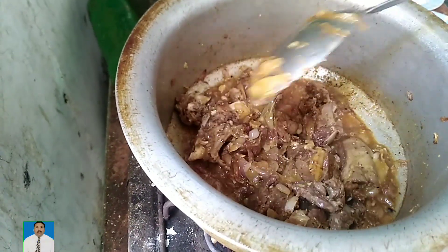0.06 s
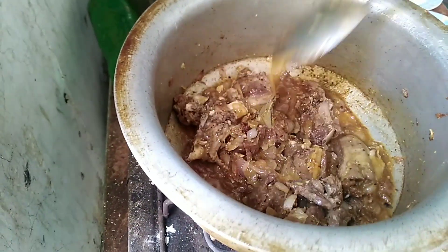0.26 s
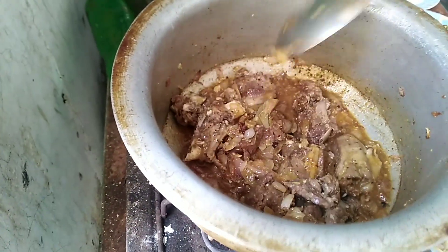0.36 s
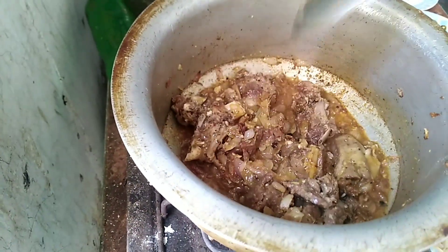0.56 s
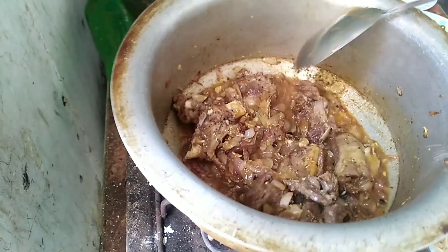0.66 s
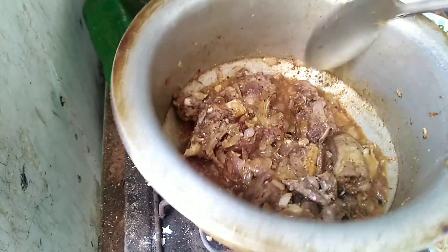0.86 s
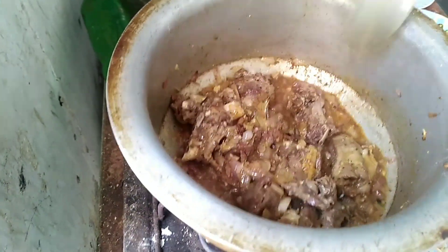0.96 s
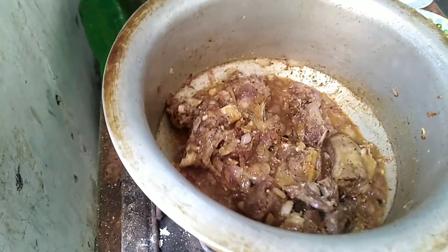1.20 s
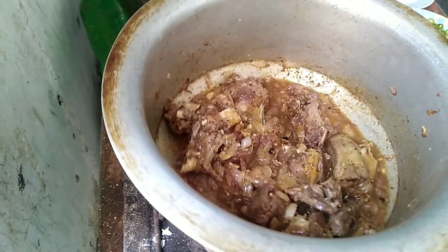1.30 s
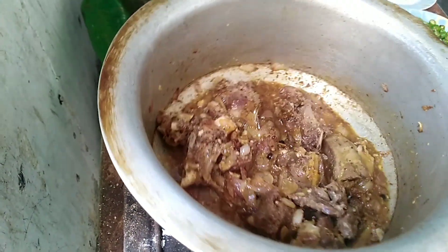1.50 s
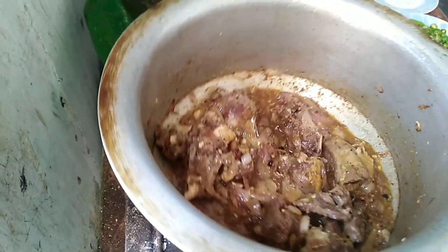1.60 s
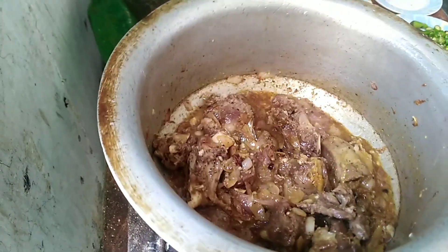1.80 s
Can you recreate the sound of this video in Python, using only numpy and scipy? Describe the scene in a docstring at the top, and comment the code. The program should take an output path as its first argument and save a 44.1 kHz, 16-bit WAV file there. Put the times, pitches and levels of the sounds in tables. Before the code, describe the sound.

A steel ladle knocks on the rim of a big aluminium pot at about 0.2, 0.4, 0.63 and 0.83 seconds. The first is lighter; the others clang harder, with a hollow thump and boomy metallic ring. Brief ladle chatter and dull plops of scraps follow, until 0.95. The ring fades by about 1.5, leaving faint sizzling to the end. Very close, clipped stereo, small kitchen.

```python
"""A steel ladle raps four times on the rim of a big aluminium pot, right by a stereo microphone that overloads.
Each rap sums a noise contact, a damped thump of air, a ringing rim, side, base and ladle, and a noise-built wall.
The ladle chatters as short clusters of high noise; scraps of meat drop as dull damped tones.
Stew sizzles quietly all the while in a small kitchen: patchy filtered noise and random spits.
The recorder leaves faint blips, turns quiet bands down, clips the peaks and cuts the extreme treble."""
import sys
import numpy as np
from scipy import signal
from scipy.fft import rfft, irfft, next_fast_len
from scipy.io import wavfile
from scipy.ndimage import uniform_filter1d, map_coordinates

SR = 44100
rng = np.random.default_rng(int(sys.argv[2]) if len(sys.argv) > 2 else 0)


def transcribe(u):
    """Save the signal u as a 16-bit wav file named by the first command-line argument.

    u: samples, shape (n,) or (channels, n), limited to [-1, 1]; the rate is SR.
    q: integer samples, one column per channel.
    """
    v = np.clip(np.atleast_2d(u).T, -1, 1)
    q = np.round(v * 32767).astype(np.int16)
    wavfile.write(sys.argv[1], SR, q)


N = 81585
T = np.arange(int(SR * .9)) / SR  # the time axis of one blow, s
WAVER_HZ, WAVER = 55, .28  # unsteadiness of struck metal: knots per second, depth in radians and in gain
MODE_SCATTER_DB, MODE_ATTACK_S = 1.5, .0012


def amp(db):
    """Decibels to gain."""
    return 10 ** (np.asarray(db) / 20)


def unit(x):
    """Scale to rms 1."""
    return x / np.sqrt(np.mean(x ** 2) + 1e-20)


def along(points, hz):
    """Read (freq_hz, value) points on a log frequency axis."""
    f, v = np.transpose(points)
    return np.interp(np.log(hz + 1), np.log(f + 1), v)


def fade(t60, t=T):
    """Exponential decay that falls 60 dB in t60 seconds."""
    return np.exp(-np.log(1000) * t / t60)


def swell(build_up_s, t=T):
    """Exponential approach to full level."""
    return 1 - np.exp(-t / build_up_s)


def wobble(rate):
    """A smooth random curve over one ring, rate knots a second."""
    return map_coordinates(rng.standard_normal(256), [T * rate], mode="wrap")


# Stereo lean of the pot at the microphone: freq_hz, left_minus_right_db
POT_BALANCE = [(100, -6), (450, -5), (1000, -3), (1600, -4.5), (2600, -0.5), (4000, 1), (5600, 11.5),
               (8000, 5), (14000, 4.5)]


def pan(hz, balance=POT_BALANCE):
    """Left and right gains at these frequencies, with their mean power held at 1."""
    lean_db = along(balance, np.atleast_1d(hz))
    gains = amp(np.array([[.5], [-.5]]) * lean_db)
    return gains / np.sqrt(np.mean(gains ** 2, axis=0))


def add(out, s, x):
    """Mix x into out at time s."""
    i = int(round(s * SR))
    out[:, i:i + x.shape[1]] += x[:, :N - i]


def filtered(x, response):
    """Multiply the spectrum of x by a response of frequency."""
    m = next_fast_len(x.shape[-1] + 2048)
    return irfft(rfft(x, m) * response(np.fft.rfftfreq(m, 1 / SR)), m)[..., :x.shape[-1]]


# How alike the two channels are, for noise and ringing modes: freq_hz, likeness (0 to 1)
LIKENESS = [(100, 0.89), (400, .9), (800, 0.23), (2000, 0), (6000, 0), (14000, 0.43)]


def angle_apart(hz):
    """Phase angle in radians whose cosine is the left-right likeness."""
    return np.arccos(np.clip(along(LIKENESS, hz), -1, 1))


def coloured(white, db_of_hz, balance=POT_BALANCE):
    """Two unrelated signals to a stereo pair of rms 1, most alike in the bass."""
    def mid_side_gain(hz):
        turn = angle_apart(hz) / 2
        return amp(db_of_hz(hz)) * [np.cos(turn), np.sin(turn)]

    mid, side = filtered(white, mid_side_gain)
    left_right = np.array([mid + side, mid - side])
    return unit(filtered(left_right, lambda hz: pan(hz, balance)))


def burst(db_of_hz, balance=POT_BALANCE):
    """Fresh coloured stereo noise for one blow."""
    return coloured(rng.standard_normal((2, len(T))), db_of_hz, balance)


def tone(hz, t60, attack_s, t=T):
    """One damped resonance, in step at both ears."""
    return pan(hz) * np.sin(2 * np.pi * hz * t) * fade(t60, t) * swell(attack_s, t)


def ring(pitches, levels_db, t60s):
    """Struck modes that waver a little; where likeness is low they reach the two ears out of step."""
    out = np.zeros((2, len(T)))
    for hz, db, t60 in zip(pitches, levels_db, np.broadcast_to(t60s, len(pitches))):
        apart = angle_apart(hz) * rng.choice([-.5, .5])
        phase = rng.uniform(0, 2 * np.pi) + np.array([[apart], [-apart]]) + WAVER * wobble(WAVER_HZ)
        struck = amp(db + MODE_SCATTER_DB * rng.standard_normal())
        size = struck * (1 + WAVER * wobble(WAVER_HZ))
        out += size * pan(hz) * fade(t60) * np.sin(2 * np.pi * hz * T + phase)
    return out * swell(MODE_ATTACK_S)


# Colour of the frying: freq_hz, relative_db_per_hz
SIZZLE_COLOUR = [(18, -67.5), (30, -28.5), (83, -5.5), (346, -10.5), (497, -18.5), (1090, -8),
                 (1270, -17.5), (1650, -10), (2030, -24), (2250, -5), (2560, -11.5), (5730, -1.5),
                 (13900, -26.5), (15000, -48.5)]
# Rise and fall of the frying, in two runs of points: start_s, relative_level_db
SIZZLE_COURSE = [
    [(0.0, -54.5), (0.014, -49.5), (0.066, -53), (0.1, -50), (0.17, -50.5)],
    [(1.25, -51), (1.646, -49), (1.656, -53), (1.844, -55), (1.85, -50)],
]
# Stereo lean of the frying: freq_hz, left_minus_right_db
SIZZLE_LEAN = [(100, -1.5), (1000, -5), (2500, 0.5), (5500, 10), (12000, 2)]
SIZZLE_DB, PATCHY_DB = 3.5, 3.5  # gain over the course above; unevenness of the hiss
SPIT_RATE, SPIT_DB, SPIT_SPREAD_DB = 1200, -8, 3  # spits per second; level against the hiss; size spread


def sizzle():
    """A hiss of frying, patchy in time and pitch, with tiny spits of fat as random clicks on top."""
    z = signal.stft(rng.standard_normal((2, N)), nperseg=512)[2]
    patches = uniform_filter1d(rng.standard_normal(z.shape[1:]), size=5, axis=0)
    patches = uniform_filter1d(patches, size=14, axis=1)
    hiss = unit(signal.istft(z * amp(PATCHY_DB * unit(patches)), nperseg=512)[1][:, :N])
    when = rng.random(N) < SPIT_RATE / SR
    size = amp(SPIT_SPREAD_DB * np.minimum(rng.exponential(size=N), 4))
    spits = when * size * rng.standard_normal((2, N))
    frying = hiss + amp(SPIT_DB) * unit(spits)
    level_db = np.interp(np.arange(N) / SR, *np.vstack(SIZZLE_COURSE).T)
    return amp(level_db + SIZZLE_DB) * coloured(frying, lambda hz: along(SIZZLE_COLOUR, hz), SIZZLE_LEAN)


# Faint blips left by the recorder's noise suppressor: pitch_hz, level_db (before random size)
BLIP_TONES = [(1110, -66), (1660, -57), (2300, -57), (2850, -60), (3350, -61)]
BLIP_RATE, BLIP_SPREAD = 9, 0.015  # blips per second round each pitch; detuning either way, fraction
BLIP_T60, BLIP_ATTACK_S = .07, 0.0013


def suppressor_blips():
    """Faint blips left by the recorder's noise suppressor: short damped tones at random times."""
    out = np.zeros((2, N))
    for hz, db in BLIP_TONES:
        for when, size, detune in rng.random((int(BLIP_RATE * N / SR), 3)):
            pitch = hz * (1 + BLIP_SPREAD * (2 * detune - 1))
            blip = tone(pitch, BLIP_T60, BLIP_ATTACK_S, T[:SR // 8])
            add(out, when * (N - 1) / SR, amp(db) * 2 * size * blip)
    return out


# The wall's dense small modes, heard in the graze and the wall: freq_hz, relative_db_per_hz
WALL_COLOUR = [(30, -33.5), (70, -13), (160, 0.5), (300, 2), (430, 2), (620, -4), (1100, -1), (1380, -9),
               (1620, -3), (1850, -7.5), (3000, -5.5), (4400, -10), (5800, -4), (7500, -9.5),
               (10000, -21.5), (13500, -23), (14600, -38), (16000, -55)]
GRAZE_S, GRAZE_DB = 0.0026, -30  # lead before the landing


def graze():
    """The ladle brushes the rim just before it lands: wall-coloured noise ramping down to nothing."""
    noise = burst(lambda hz: along(WALL_COLOUR, hz))
    return amp(GRAZE_DB) * noise * np.clip(1 - T / (2 * GRAZE_S), 0, 1)


# Colour of the first contact of ladle and rim: freq_hz, relative_db
CLANK_COLOUR = [(40, -20.5), (200, -1), (600, -9.5), (950, 10), (1500, 3), (2500, -7), (5000, -11),
                (9000, -10.5), (15000, -26.5)]
# Stereo lean of that contact: freq_hz, left_minus_right_db
CLANK_LEAN = [(100, -11), (500, -6.5), (1000, -7), (2500, -0.5), (5500, 7), (14000, 3.5)]
CLANK_T60, CLANK_DB = 0.045, -9.5


def clank():
    """First contact of metal on metal: broad, quickly dying noise."""
    return amp(CLANK_DB) * burst(lambda hz: along(CLANK_COLOUR, hz), CLANK_LEAN) * fade(CLANK_T60)


# Stereo lean of the ladle's bowl: freq_hz, left_minus_right_db
CLINK_LEAN = [(1000, -2), (3000, 5.5), (5000, 21.5), (7000, 2.5), (14000, 6)]
CLINK_T60, CLINK_WIDTH_HZ = 0.027, 990  # width between the -6 dB points, before the stereo lean


def clink(pitch_hz):
    """The ladle's bowl gives a short, narrow cluster of high modes, made from noise round one pitch."""
    def peak_db(hz):
        return -20 * np.log10(1 + (2 * (hz - pitch_hz) / CLINK_WIDTH_HZ) ** 2)

    return burst(peak_db, CLINK_LEAN) * fade(CLINK_T60)


THUMP_HZ, THUMP_T60, THUMP_ATTACK_S, THUMP_DB = 405.4, 0.033, .0015, 2.5


def thump():
    """The air in the pot answers with one heavily damped tone."""
    return amp(THUMP_DB) * tone(THUMP_HZ, THUMP_T60, THUMP_ATTACK_S)


RIM_HZ, RIM_DB, RIM_T60, RIM_SWELL_S = 1217, -12, .37, .004
RIM_BEAT_HZ, RIM_BEAT_DEPTH = 14, .55


def rim():
    """The rim's split bending mode swells and beats, the beat slightly offset between the ears."""
    beat_phase = 2 * np.pi * RIM_BEAT_HZ * T + np.array([[0], [1]]) + wobble(RIM_BEAT_HZ) / 2
    beat = 1 - RIM_BEAT_DEPTH * np.cos(beat_phase)
    waver = WAVER * np.array([wobble(WAVER_HZ), wobble(WAVER_HZ)])
    phase = 2 * np.pi * RIM_HZ * T + waver + np.array([[0], [np.pi / 2]])
    return amp(RIM_DB) * pan(RIM_HZ) * beat * np.sin(phase) * fade(RIM_T60) * swell(RIM_SWELL_S)


# Decay of the wall by pitch, also pacing the side: freq_hz, t60_s
WALL_DECAY = [(100, 0.86), (260, 0.63), (700, 0.59), (1800, 0.49), (5000, 0.45), (13000, .37)]
# Build-up of the wall by pitch: freq_hz, build_up_s
WALL_BUILD_UP = [(100, 0.017), (250, 0.06), (500, 0.015), (1500, 0.006), (10000, .002)]
WALL_DB, WALL_SCATTER_DB = -12.5, 3.8
EARLY_DB, EARLY_T60 = -3.5, 0.11  # a faster-dying extra part, against the wall's own ring


def wall(comb, wall_db, base_db, split_hz=520):
    """Crowded modes of the pot as decaying noise; the low part of the sound swells in slowly and lasts longest."""
    def colour_db(hz):
        scatter = np.interp(hz, np.linspace(0, SR / 2, len(comb)), comb)
        scatter_share = np.clip(hz / (2 * split_hz) - .5, 0, 1)  # none below the split
        return along(WALL_COLOUR, hz) + WALL_SCATTER_DB * scatter_share * scatter

    def strike_gain(hz):  # the base level rules below the split, the wall level above it
        return amp(wall_db + (base_db - wall_db) / (1 + (hz / split_hz) ** 4))

    hz, t, z = signal.stft(filtered(burst(colour_db), strike_gain), SR, nperseg=512)
    build_up = swell(along(WALL_BUILD_UP, hz)[:, None], t + t[1])
    decay = fade(along(WALL_DECAY, hz)[:, None], t)
    x = signal.istft(z * build_up * decay, SR, nperseg=512)[1][:, :len(T)]
    return amp(WALL_DB) * x * (1 + amp(EARLY_DB) * fade(EARLY_T60)) * swell(MODE_ATTACK_S)


# Modes of the pot's side: pitch_hz
SIDE_PITCHES = [180, 364, 425, 460, 514, 1025, 1532, 1611, 1679, 2202, 2531, 3080, 3554, 3833, 4166, 4540,
                5523, 5636, 5777, 6385]
# The same modes: level_db (before scatter and the rap's own level)
SIDE_LEVELS = [-28, -24, -22.5, -26.5, -21.5, -27, -30, -23.5, -29, -30.5, -26, -29, -31.5, -27, -33, -28.5,
               -23, -34.5, -25.5, -34.5]
SIDE_LIFE = .75  # decay time as a share of the wall's


def side():
    """The pot's side rings in separate modes that die in step with the wall, only sooner."""
    return ring(SIDE_PITCHES, SIDE_LEVELS, SIDE_LIFE * along(WALL_DECAY, np.array(SIDE_PITCHES)))


# Modes of the ladle: pitch_hz
LADLE_PITCHES = [2283, 4170, 4540, 5082, 5281]
# The same modes: level_db (before scatter and the rap's own level)
LADLE_LEVELS = [-28, -24, -15, -24, -25]


def ladle():
    """The steel ladle rings briefly in a few high modes."""
    return ring(LADLE_PITCHES, LADLE_LEVELS, .11)  # t60 in s


BASE_HZ, BASE_DB, BASE_T60, BASE_SWELL_S = 104.7, -23, 0.65, 0.054
BASE_WAVER_HZ, BASE_WAVER_DB = 14, 3.5  # knots per second; unevenness of level


def base():
    """The loaded base booms late and unevenly: one slow-swelling low mode."""
    phase = 2 * np.pi * BASE_HZ * T + wobble(BASE_WAVER_HZ)
    level = amp(BASE_DB + BASE_WAVER_DB * wobble(BASE_WAVER_HZ))
    return pan(BASE_HZ) * level * fade(BASE_T60) * swell(BASE_SWELL_S) * np.sin(phase)


# Raps on the rim, levels relative to each part's own: start_s, thump_db, clank_db, clink_db,
# clink_pitch_hz, rim_db, side_db, wall_db, base_db, ladle_db
RIM_RAPS = [(0.2033, -0.5, -8.5, -17.5, 4600, -37, -11, -11, -5.5, 5.5),
            (0.4075, -3.5, -2, -4, 5750, -0.5, -1.5, -3.5, -1, -14.5),
            (.6250, -3.5, 0, -5.5, 5800, 1.5, 1.5, -2, 2, -5),
            (0.8313, 2.5, -0.5, -8, 5624, -6, 2.5, -1.5, 5, -24)]


def raps():
    """Each blow excites air, rim, side, wall, base and ladle at once, after a faint graze."""
    out = np.zeros((2, N))
    comb = rng.standard_normal(size=900)  # one pattern of strong and weak bands for every rap
    for (s, thump_db, clank_db, clink_db, clink_hz,
         rim_db, side_db, wall_db, base_db, ladle_db) in RIM_RAPS:
        add(out, s - GRAZE_S, graze())
        contact = amp(clank_db) * clank() + amp(clink_db) * clink(clink_hz)
        low = amp(thump_db) * thump() + amp(base_db) * base()
        metal = amp(rim_db) * rim() + amp(side_db) * side() + amp(ladle_db) * ladle()
        add(out, s, contact + low + metal + wall(comb, wall_db, base_db))
    return out


# The ladle chatters on the rim after a rap: start_s, level_db, pitch_hz
LADLE_CHATTER = [(0.2088, -7.5, 4900), (0.8445, -17, 5770), (0.8476, -9, 6070), (0.858, -16, 5600)]


def chatter():
    """Small repeat contacts, each only a clink of the ladle's bowl."""
    out = np.zeros((2, N))
    for s, db, hz in LADLE_CHATTER:
        add(out, s, amp(db) * clink(hz))
    return out


# Scraps landing in the pot: start_s, level_db, pitch_hz
SCRAP_PLOPS = [(.244, -14, 240), (0.453, -14.5, 277), (0.681, -10, 275), (0.714, -9, 359),
               (0.9058, -7.5, 250.3), (.921, -6, 364), (0.943, -12, 367)]
PLOP_T60, PLOP_ATTACK_S = 0.055, .0012


def plops():
    """Soft scraps knock dully on the bottom, each one short damped low tone."""
    out = np.zeros((2, N))
    for s, db, hz in SCRAP_PLOPS:
        add(out, s, amp(db) * tone(hz, PLOP_T60, PLOP_ATTACK_S))
    return out


def scene():
    """The pot on the stove, with the recorder's faint blips mixed in."""
    return sizzle() + suppressor_blips() + raps() + chatter() + plops()


# Threshold of the recorder's noise suppressor: freq_hz, level_db (per analysis band)
SUPPRESSOR_THRESHOLD = [(100, -62), (250, -65.5), (600, -60.5), (2000, -89), (4000, -75.5), (14000, -93.5)]
GATE_DEPTH_DB = -7


def suppress(x):
    """Turn down every band whose smoothed power, shared by both channels, is under the threshold."""
    hz, _, z = signal.stft(x, SR, nperseg=1024)
    power = np.abs(uniform_filter1d(np.mean(np.abs(z) ** 2, axis=0), size=3, axis=1))
    threshold = amp(along(SUPPRESSOR_THRESHOLD, hz))[:, None] ** 2
    shut = 1 / (1 + (power / threshold) ** 2)  # 1 far below the threshold, 0 far above
    return signal.istft(z * amp(GATE_DEPTH_DB * shut), SR, nperseg=1024)[1][:, :N]


DRIVE_DB, TOP_HZ = 2.5, 16300


def record(dry):
    """The recorder suppresses quiet noise, clips near full scale and keeps nothing above its band limit."""
    x = suppress(dry) * amp(DRIVE_DB)
    clipped = x / (1 + np.abs(x) ** 12) ** (1 / 12)
    return filtered(clipped, lambda hz: hz < TOP_HZ)


dry = scene()
out = record(dry)
transcribe(out)
```